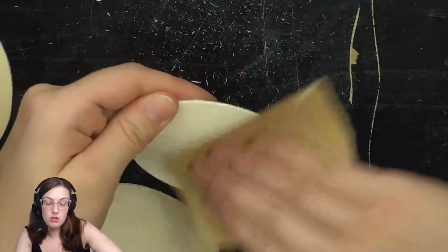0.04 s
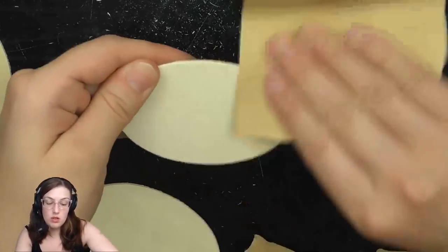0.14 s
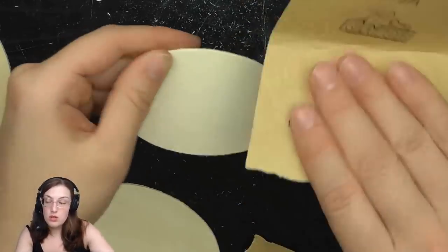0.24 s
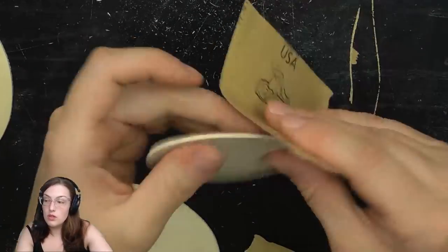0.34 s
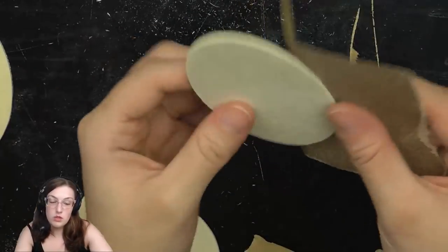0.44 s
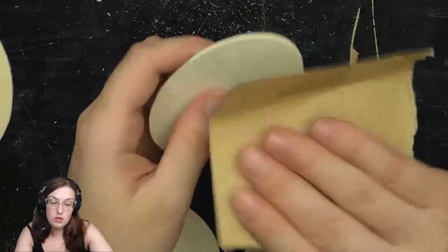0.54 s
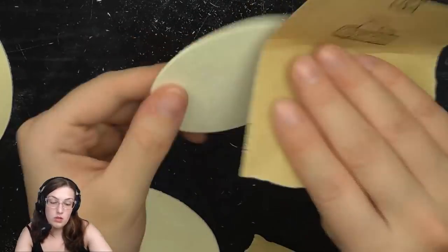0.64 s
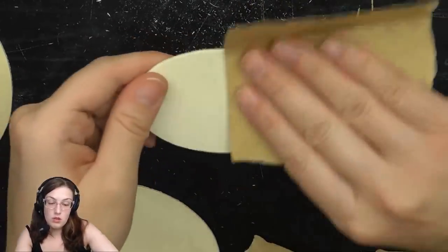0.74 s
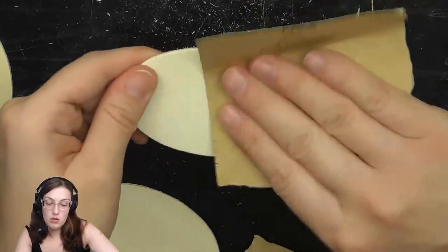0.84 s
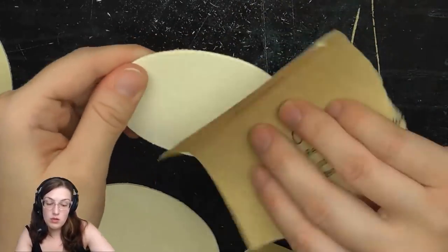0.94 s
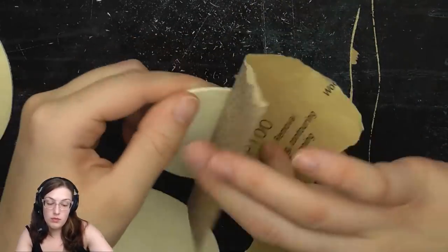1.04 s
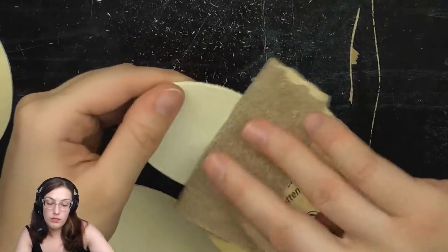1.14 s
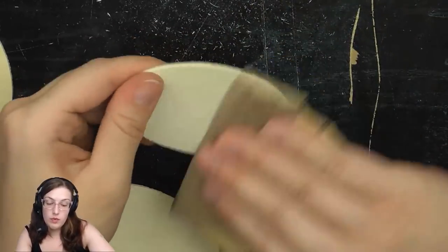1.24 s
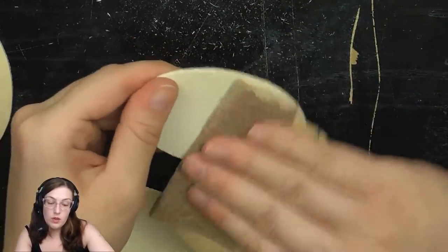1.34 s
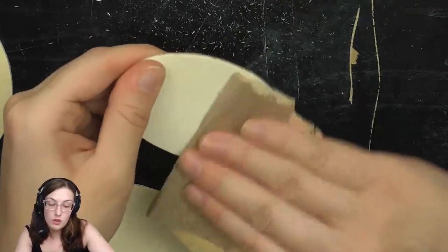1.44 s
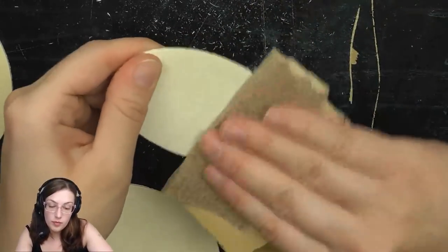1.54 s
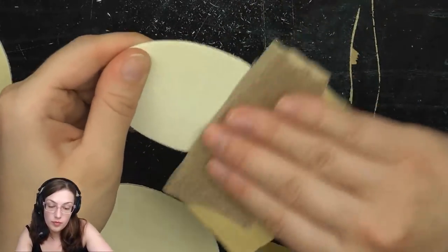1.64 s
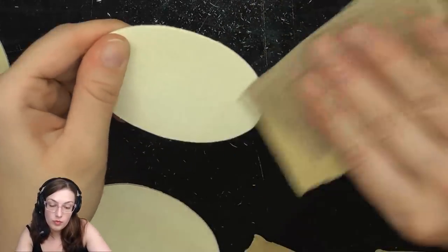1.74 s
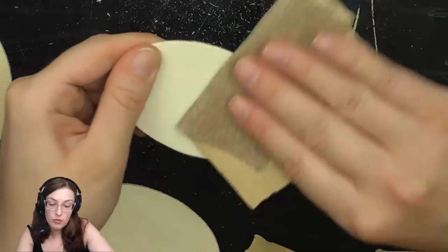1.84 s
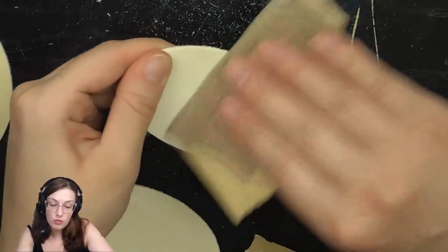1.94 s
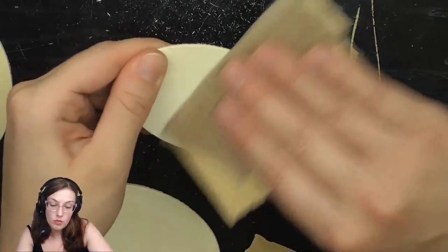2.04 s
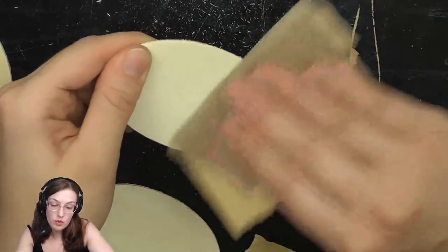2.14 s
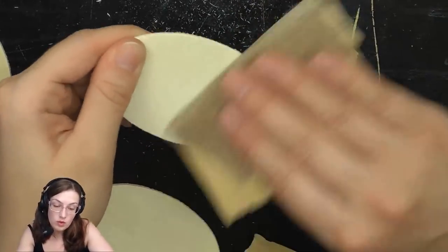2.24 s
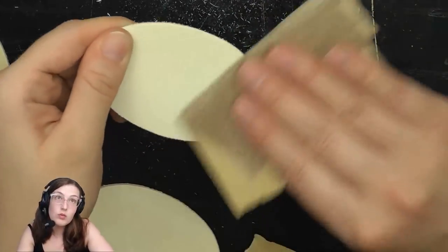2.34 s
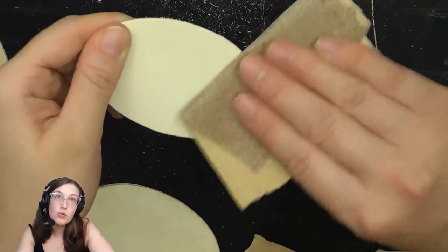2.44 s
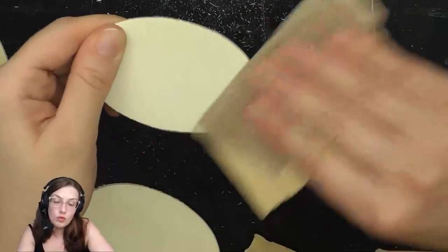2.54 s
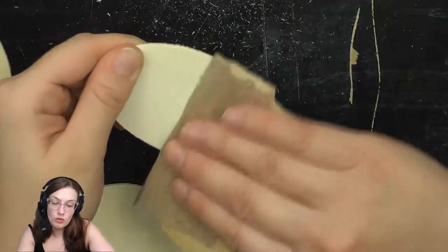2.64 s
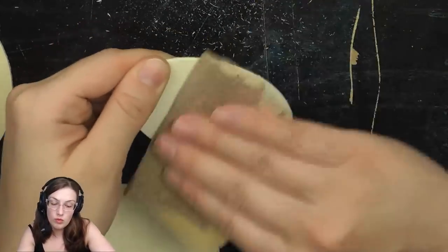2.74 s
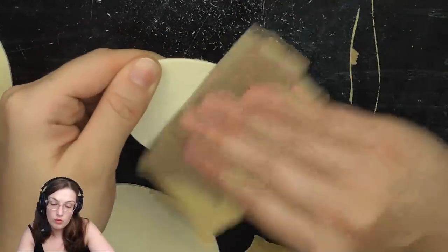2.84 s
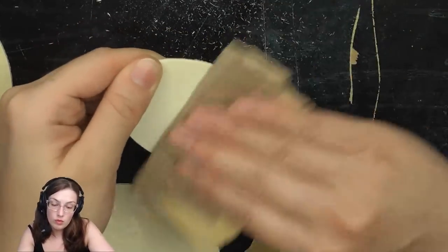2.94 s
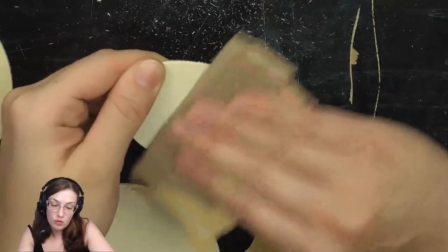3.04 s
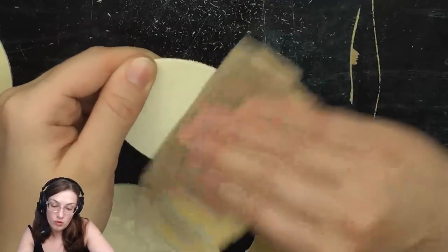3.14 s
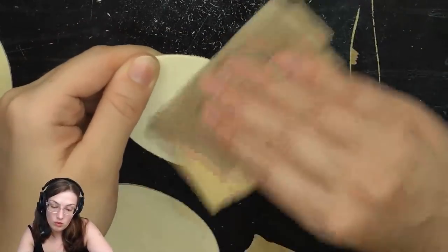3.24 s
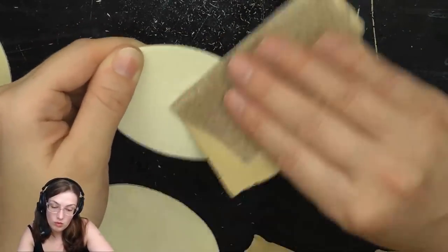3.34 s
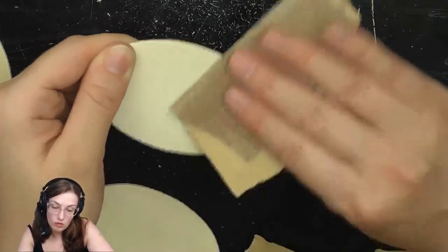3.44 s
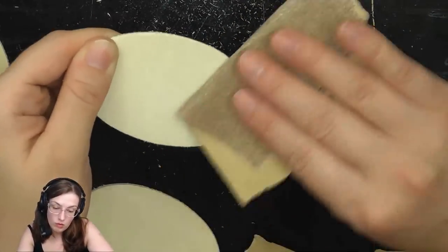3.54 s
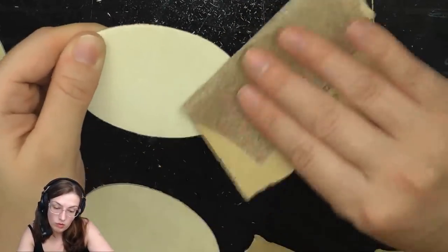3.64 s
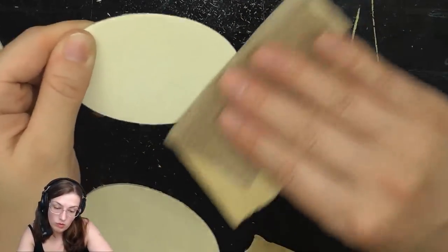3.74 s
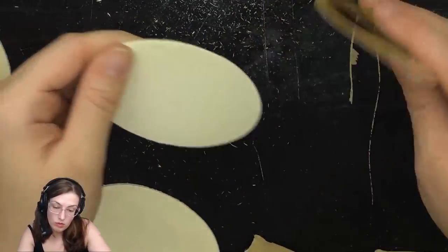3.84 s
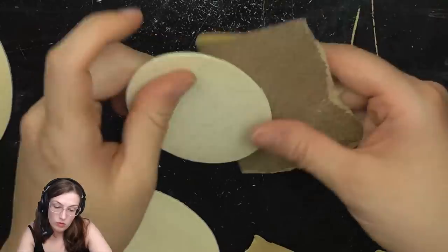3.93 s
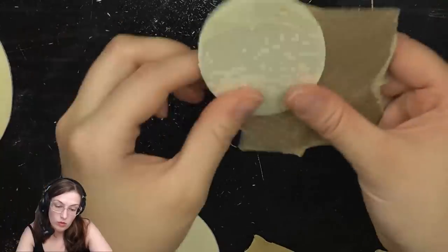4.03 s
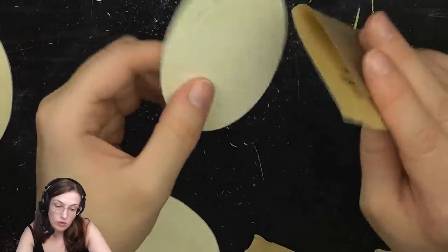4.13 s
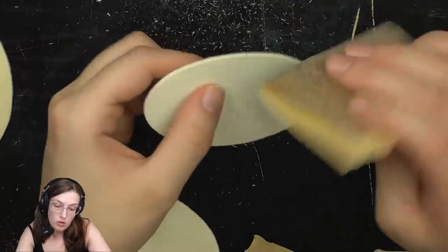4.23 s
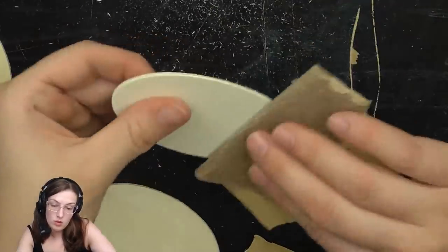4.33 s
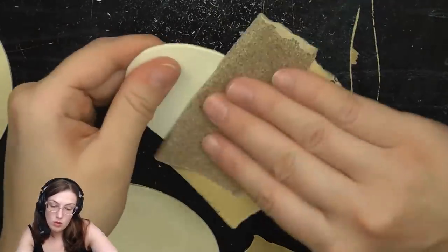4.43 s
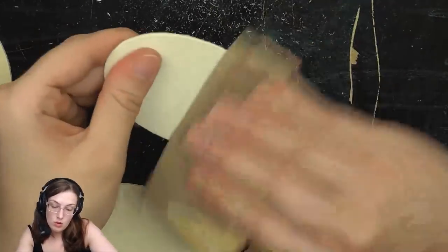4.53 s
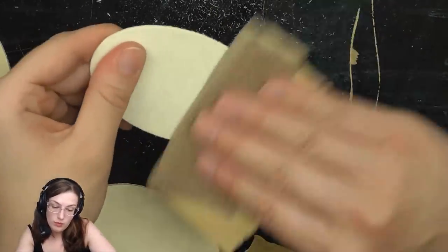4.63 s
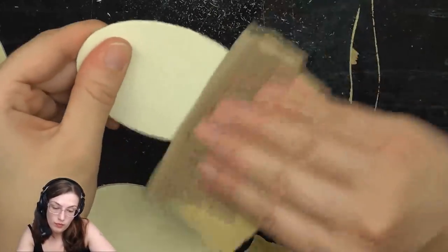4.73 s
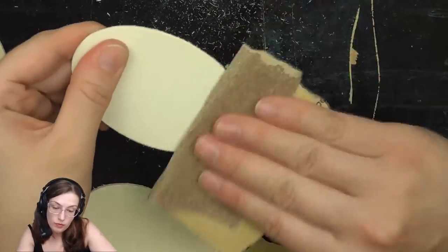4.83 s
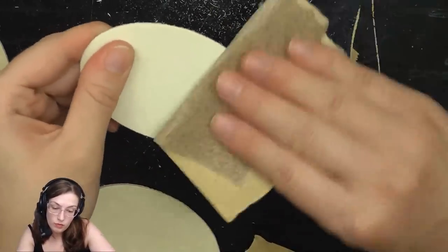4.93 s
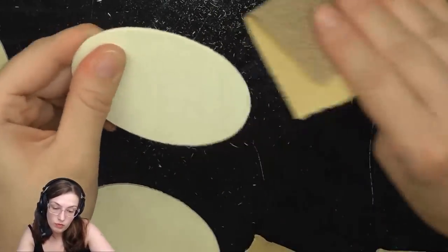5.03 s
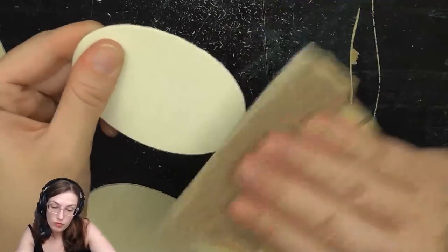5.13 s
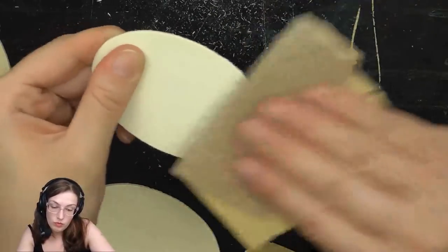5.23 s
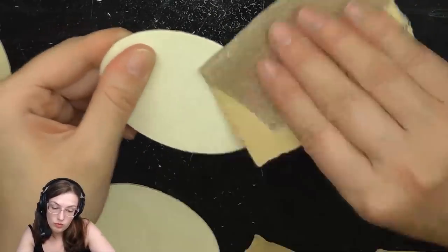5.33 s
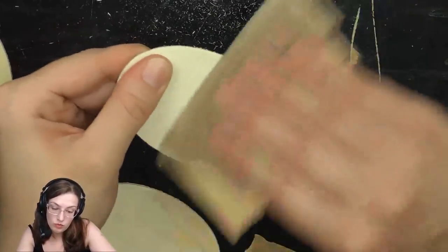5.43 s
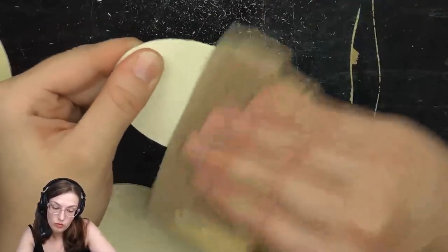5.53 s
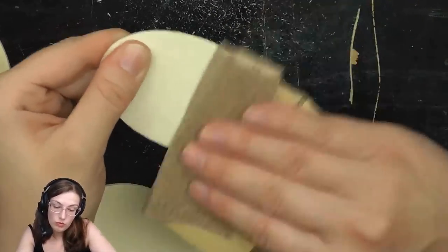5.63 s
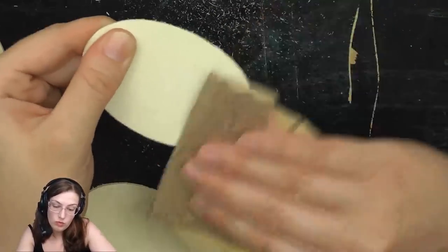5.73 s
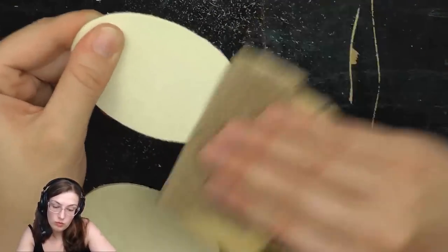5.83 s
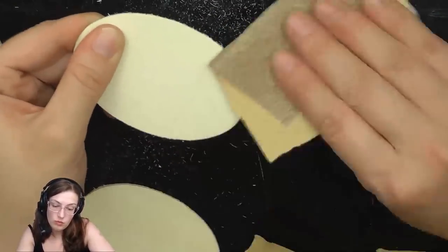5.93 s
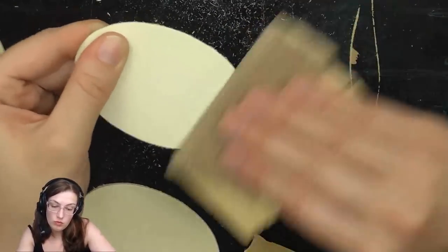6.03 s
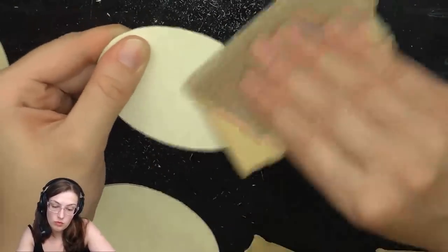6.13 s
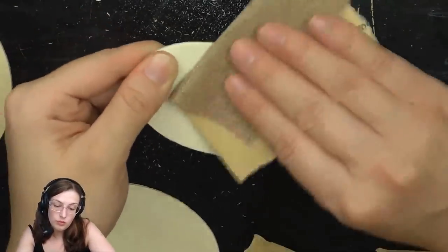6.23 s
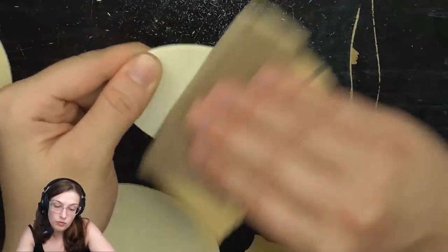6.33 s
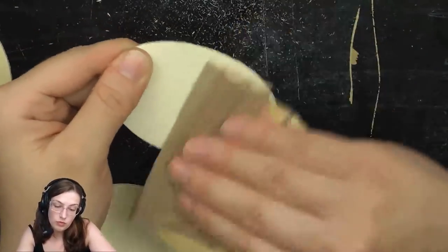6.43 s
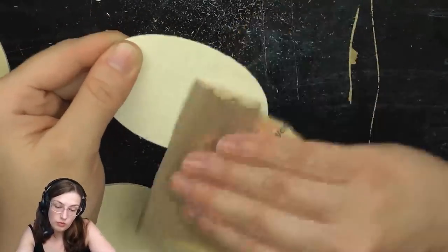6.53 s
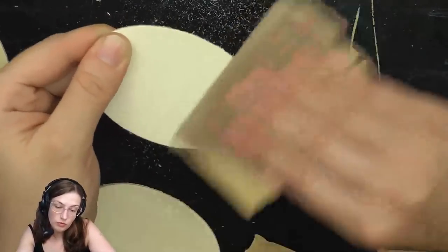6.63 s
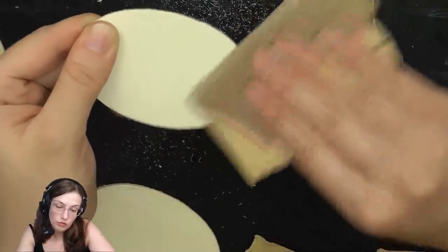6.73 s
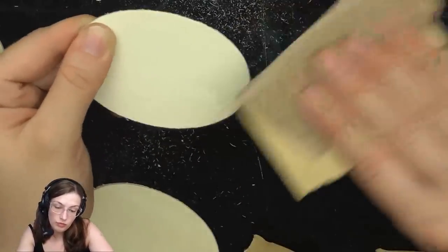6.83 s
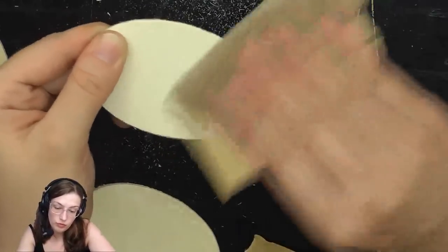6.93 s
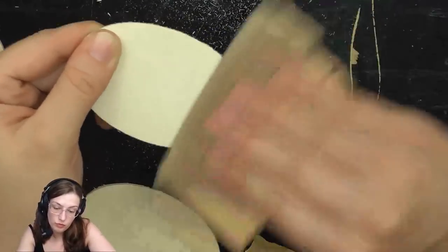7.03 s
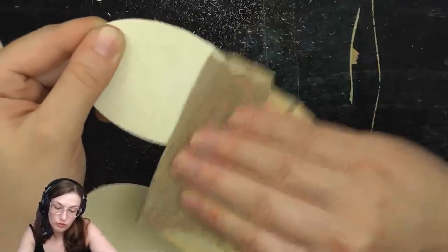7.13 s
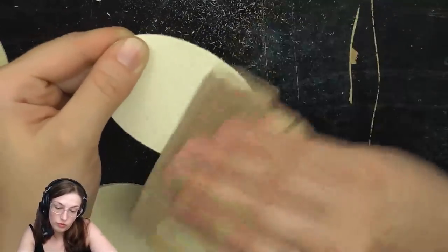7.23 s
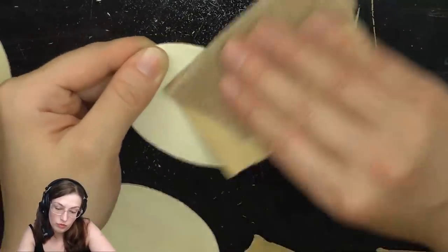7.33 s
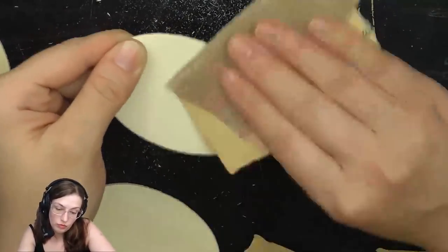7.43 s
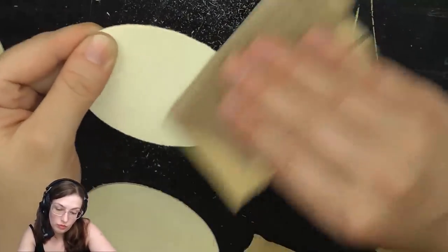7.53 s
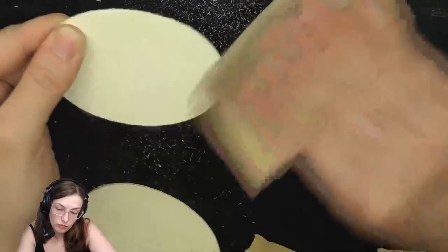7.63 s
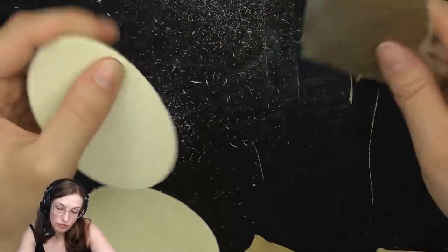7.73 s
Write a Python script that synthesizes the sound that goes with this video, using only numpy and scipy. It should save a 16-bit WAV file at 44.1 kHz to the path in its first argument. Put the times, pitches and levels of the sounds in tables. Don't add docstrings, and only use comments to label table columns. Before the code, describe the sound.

Close, dry sound of coarse sandpaper on a thin hand-held wooden disc in a quiet room. A short fast scrub runs until about 0.2 s, then light brushes, ticks and soft knocks; a brief dry burst comes at 0.8-0.9 s and more small handling clicks near 1.1 s. From 1.2 s rapid strokes, nearly forty a second, flutter into a gritty hiss, fading near 1.75 s and resuming with more woody ring until 2.6 s. A longer, harder scrub lasts to 3.8 s. The disc is turned in a pause with faint rustles and taps until 4.45 s. Another burst runs to 4.87 s, followed by a few separate light wipes and ticks until 5.2 s. Strong scrubbing then builds from 5.25 s, with tiny breaks near 6.0 and 6.8 s, finishing hard at 7.65 s. Faint room noise, a slight machine tone and low rumble remain.

```python
import sys
import numpy as np
from scipy import signal
from scipy.fft import rfft, irfft
from scipy.io import wavfile

SR = 44100
rng = np.random.default_rng(int(sys.argv[2]) if len(sys.argv) > 2 else 0)


def ratio(d):
    e = np.asarray(d, float) / 20
    return 10 ** e


def persist_wave(psi):
    counts = np.round(np.clip(psi, -1, 1) * 32767).astype(np.int16)
    wavfile.write(sys.argv[1], SR, np.atleast_2d(counts).T)


N = 342657


def rms_one(x):
    return x / np.sqrt(np.mean(x ** 2) + 1e-20)


def in_time(rows):
    s, *columns = np.transpose(rows)
    return [np.interp(np.arange(N) / SR, s, c) for c in columns]


def drift(rate_hz):
    r = np.exp(-2 * np.pi * rate_hz / SR)
    noise = rng.standard_normal(N + SR)
    return rms_one(signal.lfilter([1], [1, -2 * r, r * r], noise)[SR:])


def colour(x, points, size=8192):
    hz, db = np.transpose(points)
    grid = np.maximum(np.arange(size // 2 + 1) * SR / size, 1)
    curve_db = np.interp(np.log(grid), np.log(hz), db, left=db[0] - 20)
    cepstrum = irfft(curve_db * np.log(10) / 20)
    cepstrum[1:size // 2] *= 2
    cepstrum[size // 2 + 1:] = 0
    impulse = irfft(np.exp(rfft(cepstrum)))
    return rms_one(signal.fftconvolve(x, impulse)[:N])


def resonance(x, hz, width_hz):
    r = np.exp(-np.pi * width_hz / SR)
    zeros = (1 - r * r) / 2 * np.array([1, 0, -1])
    poles = [1, -2 * r * np.cos(2 * np.pi * hz / SR), r * r]
    return signal.lfilter(zeros, poles, x)


def grit(per_s, spread_db):
    sizes = ratio(spread_db * np.minimum(rng.exponential(1, N), 3.2)) * rng.choice([-1, 1], N)
    return rms_one(sizes * (rng.random(N) < per_s / SR))


def swells(times, level_db, length_ms, rise, fall, lean):
    power, around = np.zeros(N + SR), np.arange(-SR // 16, SR // 16)
    before = around < 0
    steepness = np.where(before, rise, fall)
    stretch = np.where(before, 1 / lean, lean)
    for s, db, ms in zip(times, level_db, length_ms):
        u = np.abs(around) / SR / (ms / 1000) / stretch
        power[round(s * SR) + SR // 2 + around] += ratio(2 * db) * np.exp(-u ** steepness)
    return np.sqrt(power[SR // 2:SR // 2 + N])


def noise_band(order, low_hz, high_hz):
    band = signal.butter(order, [low_hz, high_hz], "band", fs=SR, output="sos")
    return rms_one(signal.sosfilt(band, rng.standard_normal(N + SR))[SR:])


def background():
    # f/Hz, density/dB
    room = [(60, -9), (266, -7), (700, -11.5), (2400, -6.5), (3960, -12), (6500, -12), (9500, -21),
            (15700, -22)]
    # t/s, sway level/dB, lumps level/dB
    rumble_curve = [(0.0, -59, -77), (0.13, -66, -91), (0.26, -57, -71), (0.37, -77, -82.5),
                    (1.38, -59.5, -87), (1.64, -62.5, -89), (2.08, -61.5, -70.5), (3.55, -66, -87),
                    (3.66, -65, -68.5), (4.11, -77, -92), (4.18, -63.5, -70.5), (4.76, -62.5, -80),
                    (6.77, -61, -80), (6.84, -62, -67), (7.06, -61, -86), (7.29, -59, -75.5),
                    (7.68, -67, -79), (7.77, -76, -95)]
    above = signal.butter(3, 110, "high", fs=SR, output="sos")
    air = rms_one(signal.sosfilt(above, colour(rng.standard_normal(N), room)))
    air = air + ratio(-15.5) * rms_one(resonance(rng.standard_normal(N), 588, 43))
    air = air + ratio(-14) * rms_one(resonance(rng.standard_normal(N), 2620, 250))
    sway_db, lumps_db = in_time(rumble_curve)
    sway = ratio(sway_db - 1.5 + 2.1 * drift(7.5)) * noise_band(3, 7, 31)
    lumps = ratio(lumps_db - 2.0 + 3.0 * drift(9.4)) * noise_band(2, 30, 115)
    return ratio(-72 + 0.91 * drift(4.4)) * air + sway + lumps


def taps():
    # t/s, peak level/dB, upper edge f/Hz (dull to bright)
    ticks = [(.311, -65, 3000), (0.361, -52, 5000), (0.5823, -51, 4000), (0.7203, -45.5, 7000),
             (1.098, -52, 3500), (1.1107, -47.5, 9000), (1.1495, -47.5, 8000), (4.2181, -53.5, 3500),
             (4.302, -43.5, 5000), (4.317, -51, 5000), (4.4408, -49.5, 3000), (4.9338, -52, 4000),
             (5.018, -40.5, 3000), (5.0852, -47, 2500), (5.0986, -43, 9000), (5.171, -45.5, 7000)]
    # t/s, peak level/dB, pitch f/Hz, length/ms
    knocks = [(.177, -61, 604, 4.8), (.25, -67, 336, 9.4), (.313, -57.5, 598, 1.9), (.723, -64, 560, 3.5),
              (1.102, -53, 2370, 3.0), (1.41, -68, 190, 7), (2.13, -66.5, 210, 8), (4.46, -67, 290, 8.3),
              (1.277, -63, 261, 3.7), (1.407, -59, 820, 6.5), (2.115, -56, 91, 12), (2.161, -67, 132, 6.4),
              (2.289, -58.5, 368, 3.3), (2.293, -55.5, 792, 4.9), (2.34, -59.5, 122, 7.1),
              (2.361, -62.5, 178, 6.9), (2.595, -66, 80, 8.8), (3.691, -70, 68.6, 25),
              (4.064, -56, 1560, 3.9), (4.36, -61.5, 80, 14), (5.021, -56, 606, 4.7),
              (5.087, -54.5, 606, 2.2), (6.154, -67, 220, 10.5), (6.829, -60, 79.5, 9.2)]
    out, t = np.zeros(N), np.arange(SR // 10) / SR
    for s, peak_db, hz in ticks:
        crack = rng.standard_normal(len(t)) * np.exp(-t / 0.0023)
        crack = signal.lfilter(*signal.butter(2, [300, hz], "band", fs=SR), crack)
        out[round(s * SR):round(s * SR) + len(t)] += ratio(peak_db) * crack / np.abs(crack).max()
    for s, peak_db, hz, ms in knocks:
        note = np.sin(2 * np.pi * hz * t) * np.exp(-((t - t[-1] / 2) * 1000 / ms) ** 2)
        out[round(s * SR) - len(t) // 2:][:len(t)] += ratio(peak_db) * note
    return out


def brushes():
    # t/s, peak level/dB, low share level/dB, length/ms
    rubs = [(0.3085, -38, -26, 4.6), (0.3616, -50, -22, 7), (0.4094, -47, -23, 7.6),
            (0.46, -47.5, -14.5, 7.3), (0.5806, -43.5, -22, 8), (0.6569, -40.5, -25, 5.9),
            (0.7537, -31.5, -32, 16), (0.9877, -46, -31, 6.5), (1.0211, -45, -26, 4.4),
            (1.0779, -45, -33, 5.9), (1.1483, -45, -17, 7.3), (1.755, -38.5, -18.5, 7.1),
            (2.6509, -30.5, -29, 8.2), (4.061, -36, -24, 6.6), (4.3194, -48.5, -16, 15),
            (4.3494, -53, -10, 9), (4.3919, -46, -16, 5.3), (4.4223, -41.5, -22, 4.6),
            (4.934, -47, -5.5, 4.2), (5.087, -44, -18, 5.6), (5.1994, -44, -23, 4.4),
            (6.021, -26.5, -40, 17)]
    # f/Hz, density/dB
    bright_spectrum = [(1500, -8), (3000, -5), (6500, -3), (9000, -8), (16000, -24)]
    # f/Hz, density/dB
    low_spectrum = [(150, -8.5), (600, -2.5), (1500, 3), (2500, -17), (4000, -42)]
    s, peak_db, low_db, length_ms = np.transpose(rubs)
    s, length_ms = s + 0.004, np.clip(length_ms, 3, 20)
    grain = grit(7000, spread_db=5.0)
    high = swells(s, peak_db - 23.5, length_ms, rise=1.8, fall=2.1, lean=1.5)
    low = swells(s, peak_db + low_db - 7.5, length_ms, rise=2.9, fall=2.5, lean=0.88)
    return high * colour(grain, bright_spectrum) + low * colour(grain, low_spectrum)


def strokes(bout):
    stroke_s = .0263
    push_early_s = 0.00053
    push_dull_db, dull_per_db = -0.05, 1.6
    s, level_db, push_db, ring_db = np.transpose(bout)
    number = np.r_[0, np.cumsum(np.maximum(np.round(np.diff(s) / stroke_s), 1))]
    k = np.arange(number[-1] + 1)
    s, level_db, push_db, ring_db = (np.interp(k, number, c) for c in (s, level_db, push_db, ring_db))
    push = (-1) ** k
    chance = rng.standard_normal((3, len(k)))
    s = s - push_early_s * push + .001 * chance[0]
    ring_db = ring_db - (push_dull_db + dull_per_db * push_db) * push + 1.2 * chance[2]
    return s, level_db + push_db * push + .8 * chance[1], ring_db


def hand_speed():
    # t/s, pressure as level/dB, push over pull level/dB, ring over hiss level/dB
    first_edge = [
        [(-.017, -36.5, 2.6, -9), (.177, -39, .9, -12), (.203, -37, 1.5, -10)],
        [(.781, -42.9, 2, -17), (.859, -39, -1.5, -10), (.913, -39.5, 2, -23)],
        [(1.189, -45.5, -3, -9.5), (1.245, -40, -1, -8), (1.526, -41, 0, -3), (1.627, -44, 3, -6),
         (1.726, -44, 0.5, -1.5), (1.757, -55.5, -1, -7)],
        [(1.827, -46.5, -3.5, -5.5), (1.904, -39, 0.8, -3.5), (1.987, -39, -0.5, -3.5), (2.163, -40.5, 1, -6.5),
         (2.338, -42, 0, -1.5), (2.436, -51, 4, 5), (2.564, -45, -2.8, -2.5)],
        [(2.655, -54, -3, 2), (2.681, -40, -1.5, -0.2), (2.76, -39.5, 0.5, -7.9), (2.84, -34.5, 2.2, -11),
         (2.937, -40, 2, -4.5), (3.164, -34, 0.5, -11.5), (3.329, -39, 3.5, -8.5), (3.48, -37.5, 2.5, -7),
         (3.793, -47, 1.6, -2.7)],
    ]
    second_edge = [
        [(4.475, -39, -.5, -7), (4.555, -36, -0.31, -7.5), (4.708, -38.5, 1.4, -8), (4.866, -41.5, -.9, -6)],
        [(5.257, -46, -0.4, -5), (5.28, -40.5, -0.22, -6), (5.336, -36, 0.13, -5), (5.418, -38, 1.5, -9),
         (5.526, -33, 1.7, -9.7), (5.688, -39, -.7, -5), (5.768, -38, -.7, -4), (5.93, -38, 0.48, -6)],
        [(6.046, -43.5, 0, -2.6), (6.076, -37, 0.2, -5.8), (6.213, -36, -0.5, -9), (6.349, -39.5, 3, -3.5),
         (6.458, -35.3, -0.3, -8.5), (6.758, -40.5, -0.7, -0.5), (6.79, -40.1, -0.5, -6.5)],
        [(6.864, -58.5, -0.37, -2), (6.918, -34.5, -0.61, -9.5), (7.051, -38, -.4, -5),
         (7.08, -45.5, 0.19, -3.5), (7.135, -37, -0.088, -5.5), (7.22, -38.4, -0.82, -3.5),
         (7.302, -35, -0.034, -11), (7.439, -34, 1, -9.5), (7.65, -38.5, -1.3, -5)],
    ]
    # t/s at top speed, level/dB, ring level/dB
    wipes = [
        (.721, -58, -17),
        (1.1, -57.5, -18),
        (4.959, -48, -3),
        (5.025, -47.5, -12),
        (5.106, -47.5, -7),
        (5.174, -49, -6),
    ]
    bouts = [strokes(bout) for bout in first_edge + second_edge]
    s, level_db, ring_db = np.hstack(bouts)
    turns = np.hstack([(b[0][1:] + b[0][:-1]) / 2 for b in bouts])
    turn_db = np.hstack([(b[1][1:] + b[1][:-1]) / 2 for b in bouts])
    wipe_s, wipe_db, wipe_ring_db = np.transpose(wipes)
    speed = swells(s, level_db + 0.56, np.full(len(s), 5.2), rise=1.71, fall=1.44, lean=1.006)
    speed += swells(wipe_s, wipe_db + 0.3, np.full(len(wipe_s), 7.5), rise=1.6, fall=2.1, lean=1.48)
    drag = swells(turns, turn_db - 13.0, np.full(len(turns), 11.5), rise=11.0, fall=5.3, lean=0.53)
    s, ring_db = np.r_[s, wipe_s], np.r_[ring_db, wipe_ring_db]
    order = np.argsort(s)
    return np.hypot(speed, drag), np.interp(np.arange(N) / SR, s[order], ring_db[order])


def sanding():
    # t/s, low scrape level/dB, cupped-paper level/dB, air-pocket level/dB
    paper_lie = [(.04, -18, -7, -2), (.17, -12.5, -9.7, 4), (.85, -18, -14, 7), (1.1, -4, -20, 0),
                 (1.25, -18, -2, -4), (2.25, -21, -4.5, 5.5), (2.5, -11.5, -4.5, -11),
                 (2.75, -21, 0.5, -21), (3.15, -26, -3.5, -6), (3.75, -16, -5, -20),
                 (4.5, -19.5, -7.5, 5.5), (4.8, -20.5, -5, -8), (5.0, -2.5, -4, -10),
                 (5.35, -25.5, -5.5, 4), (5.9, -22, -5, -15), (6.35, -24, -0.5, -21), (6.9, -20, -7.5, -5),
                 (7.4, -28.5, -2.5, -24)]
    # f/Hz, bandwidth/Hz, level/dB
    disc_modes = [(565, 20, -31), (1110, 230, -42), (2564, 287, -9), (3003, 81, 1), (3224, 200, 0),
                  (3840, 430, -16.5)]
    # f/Hz, density/dB
    disc_broad = [(200, -27), (500, -18), (1000, -7), (1600, -1.5), (2200, 0.5), (3500, -0.5), (5000, -15)]
    # f/Hz, density/dB
    hiss_spectrum = [(2500, -33), (3800, -10.5), (5000, -3.5), (5750, 1.5), (7100, 0), (8500, -5),
                     (10000, -17), (12000, -34.5)]
    # f/Hz, density/dB
    sheen_spectrum = [(7000, -39.5), (9500, -0.5), (11400, 5), (12500, -3.5), (13600, -6.5), (15000, -19),
                      (16500, -8)]
    speed, ring_db = hand_speed()
    scrape_db, cup_db, pocket_db = in_time(paper_lie)
    speed = speed * ratio(0.94 * drift(140))
    contacts, finer = grit(12000, spread_db=2.0), grit(16000, spread_db=-0.5)
    drive = speed * ratio(ring_db - 2.5 + 0.74 * drift(85)) * contacts
    modes = np.zeros(N)
    for k, (hz, width_hz, db) in enumerate(disc_modes):
        modes += (-1) ** k * ratio(db) * resonance(drive, hz, width_hz)
    ring = rms_one(modes) * np.std(drive)
    scrape = ratio(scrape_db + 2 + 0.5 * drift(75)) * colour(finer, disc_broad)
    cup = ratio(cup_db - 5.5 + 2.0 * drift(40)) * rms_one(resonance(finer, 4427, 610))
    pocket = ratio(pocket_db - 17.5 + 5.3 * drift(40)) * rms_one(resonance(finer, 7130, 780))
    hiss = ratio(-4.5 + 0.63 * drift(31)) * colour(contacts, hiss_spectrum)
    brightness = (speed / ratio(-47.5)) ** 0.029
    sheen = ratio(-12) * brightness * colour(finer, sheen_spectrum)
    return ring + speed * (scrape + cup + pocket + hiss + sheen)


def scene():
    return (background() + taps() + brushes() + sanding())[None]


def roll_off(x):
    return signal.sosfilt(signal.butter(12, 15720, fs=SR, output="sos"), x)


def record(dry):
    ceiling, offset = .085, 3e-4
    top = signal.ellip(10, .5, 60, 15750, fs=SR, output="sos")
    rounded = ceiling * np.tanh(dry / ceiling)
    return roll_off(signal.sosfilt(top, rounded) + offset)


dry = scene()
out = record(dry)
persist_wave(out)
```